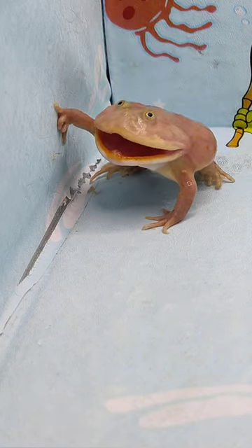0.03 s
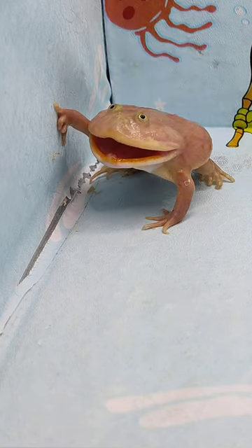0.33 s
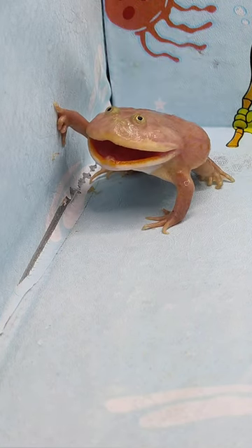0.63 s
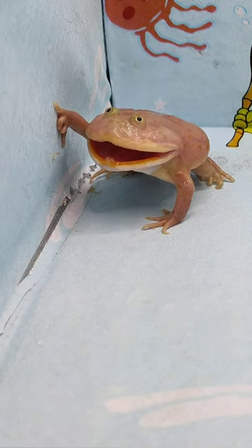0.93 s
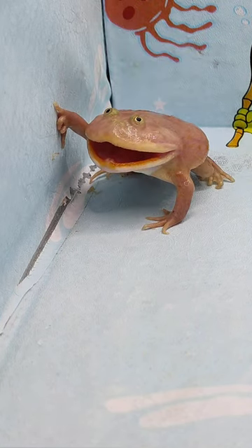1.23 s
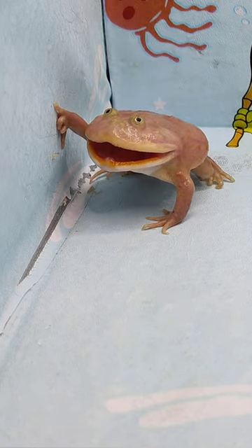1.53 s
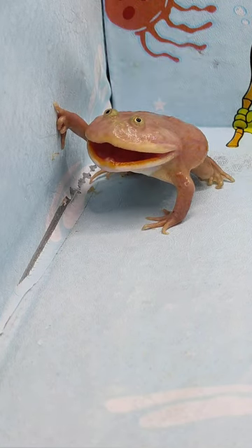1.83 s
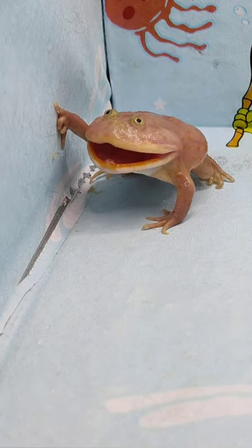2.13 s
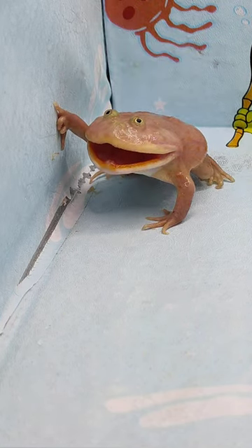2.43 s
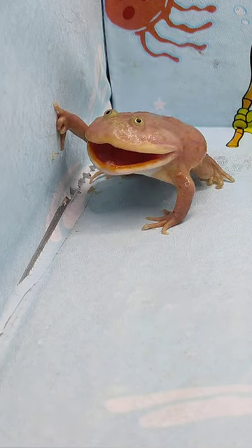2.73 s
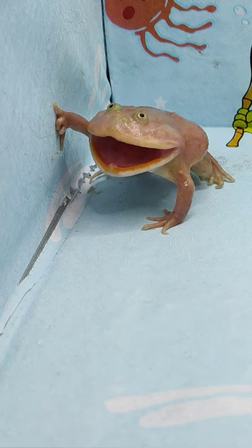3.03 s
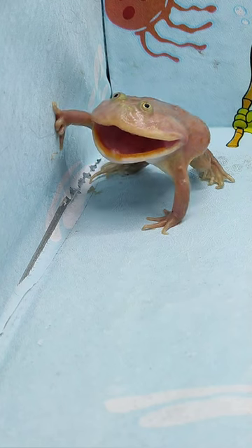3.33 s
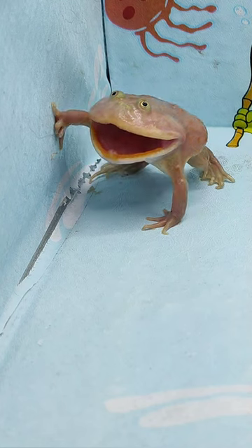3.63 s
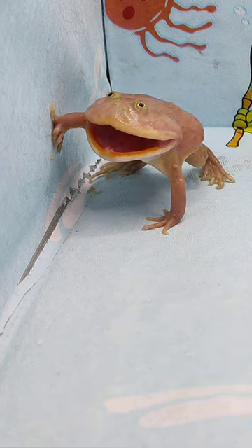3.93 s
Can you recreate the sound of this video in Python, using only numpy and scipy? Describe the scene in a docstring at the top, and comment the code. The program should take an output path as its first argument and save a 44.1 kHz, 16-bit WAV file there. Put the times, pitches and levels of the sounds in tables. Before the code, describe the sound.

A frog hisses continuously with a raspy, high squeal over soft low knocks.

```python
"""A frog gapes in a small plastic tub and a harsh, wet hiss sounds from start to end.
Tiny irregular spatters, bunched about a hundred times a second, reflect in the tub and excite narrow
resonances, one of them a squeal. Low buffets and dull knocks reach the microphone from the outset.
After three seconds the mouth opens wider: the hiss grows fuller, its bunches come quicker,
and a high resonance glides up and back down."""
import sys
import numpy as np
from scipy import signal
from scipy.fft import rfft, irfft, next_fast_len
from scipy.io import wavfile
from scipy.ndimage import uniform_filter1d

SR = 44100
rng = np.random.default_rng(int(sys.argv[2]) if len(sys.argv) > 2 else 0)


def digitize_waveform(pressure):
    """Quantize a signal to 16-bit integers and store it at the path in sys.argv[1].

    Rows of a 2-D input are taken as channels; values are limited to [-1, 1].
    """
    field = np.atleast_2d(pressure).T
    bounded = np.clip(field, -1, 1)
    quanta = np.round(bounded * 32767).astype(np.int16)
    wavfile.write(sys.argv[1], SR, quanta)


N = 176400
TIME = np.arange(N) / SR
FFT_SIZE = next_fast_len(N + SR // 2)
HZ = np.maximum(np.fft.rfftfreq(FFT_SIZE, 1 / SR), 1)


def from_db(db):
    """Decibels to amplitude ratio."""
    return 10 ** (np.asarray(db) / 20)


def unit_rms(x):
    """Normalisation: the mean of the channels gets rms 1."""
    return x / np.sqrt(np.mean(np.atleast_2d(x).mean(axis=0) ** 2) + 1e-20)


def over_time(rows):
    """Linear interpolation of a control curve at every sample."""
    return np.interp(TIME, *np.transpose(rows))


def over_hz(rows):
    """Interpolation of a table's columns along log frequency."""
    hz, *columns = np.transpose(rows)
    return np.array([np.interp(np.log(HZ), np.log(hz), column) for column in columns])


def bell(hz, width_hz):
    """Lorentzian power response of one resonance."""
    return 1 / (1 + (2 * (HZ - hz) / width_hz) ** 2)


def minimum_phase(db):
    """Causality: a response with this gain that rings only after it is excited."""
    cepstrum = irfft(np.log(from_db(db)), FFT_SIZE)
    return np.exp(rfft(cepstrum * (1 + np.sign(np.fft.fftfreq(FFT_SIZE)))))


def filtered(x, response):
    """Convolution, as a product of spectra."""
    return irfft(rfft(x, FFT_SIZE) * response, FFT_SIZE)[..., :N]


def noise(response):
    """Spectral shaping of white noise, at rms 1."""
    return unit_rms(filtered(rng.standard_normal((1, N)), response))


def sputter(wide):
    """Amplitude modulation bunches an uneven train of spatters and a little air noise."""
    spatters_per_s, spacing_spread, size_spread_db, air_db = 900, .38, 3, -9.5
    bunch_hz, wide_bunch_hz, bunch_width_hz, bunch_db = 113.6, 143, 31, 2
    spacing, size, polarity = rng.standard_normal((N // 20, 3)).T
    gaps = np.exp(spacing_spread * spacing)
    onsets = (np.cumsum(gaps / gaps.mean()) * SR / spatters_per_s).astype(int)
    heights = from_db(size_spread_db * np.minimum(size, 2)) * np.sign(polarity)
    spatters = np.zeros(N)
    spatters[onsets[onsets < N]] = heights[onsets < N]
    bunches = np.sqrt(1 - wide) * noise(bell(bunch_hz, bunch_width_hz))
    bunches += np.sqrt(wide) * noise(bell(wide_bunch_hz, bunch_width_hz))
    swell = from_db(bunch_db * np.minimum(bunches, 2))
    bunched = swell * (unit_rms(spatters) + from_db(air_db) * rng.standard_normal(N))
    return bunched / np.sqrt(uniform_filter1d(bunched ** 2, int(0.02 * SR)) + 1e-9)  # even over 20 ms


def tub(source):
    """Reverberation: direct sound, then exponentially decaying reflections, steady and scattered."""
    # reflections against the direct sound: frequency_hz, left_db, right_db
    reflection_levels = [(1360, -1, 0), (1860, -11.5, -13.5), (2420, 4, -5), (5330, 2.5, 0.5),
                         (9000, 7.5, 10), (13000, -24, 31)]
    # phase lag of the right channel behind the left: frequency_hz, lag_rad
    right_lag = [(600, 0.28), (1180, 1.77), (1400, 2.18), (2050, 3.37), (2300, 5.25), (2650, 2.4),
                 (2900, 6.54), (3500, 2.85), (4400, 6.3), (5250, 7.13), (5800, 7.4), (9000, 7.5),
                 (15500, 3.7)]
    t60_s, steady_share = 0.063, 0.51
    decay = from_db(-60 / (t60_s * SR)) ** 2  # power left after one sample
    reverberant_power = signal.lfilter([1 - decay], [1, -decay], source ** 2)
    scattered = rng.standard_normal((2, N)) * np.sqrt(reverberant_power)
    echoes = rfft(rng.standard_normal((2, SR // 4)) * np.sqrt(decay ** np.arange(SR // 4)), FFT_SIZE)
    echoes /= np.sqrt(uniform_filter1d(abs(echoes) ** 2, size=900, axis=1))
    reflected = from_db(over_hz(reflection_levels))
    lag = np.exp(1j * over_hz(right_lag) * [[0], [-1]])
    paths = (1 + reflected * np.sqrt(steady_share) * echoes) * lag
    scatter_gain = reflected * np.sqrt(1 - steady_share)
    total = np.sqrt(uniform_filter1d(abs(paths) ** 2, size=900, axis=1) + scatter_gain ** 2)
    return filtered(source, paths / total) + filtered(scattered, scatter_gain / total)


def mouth(source, wide, band):
    """Cavity resonance colours one band of the sputter; the peaks flatten as the mouth widens."""
    # broad spectral envelope: frequency_hz, left_db, right_db
    colour = [(360, -8.5, -12.0), (642, -12, -14), (910, -0.5, -5), (2685, -13.5, -7.5), (3435, 6, -3),
              (5200, -2.5, -1.5), (6360, -2, -3.5), (8000, -11, -10), (11340, -2.5, -10), (12750, 2.5, -11),
              (15500, 2, -5)]
    # resonances of mouth and tub: centre_hz, width_hz, left_db, right_db
    resonances = [(472, 137, 4, 9), (935, 46, 3, 11), (1085, 56, 2.5, 12), (1193, 94, 8.5, 5.5),
                  (1692, 284, 10, 10), (1927, 328, 11, 8), (2348, 270, 14, 2.5), (2840, 88, 10, 0),
                  (3503, 150, -5.5, 9), (3850, 360, 2, 6.5), (4090, 92, -8.5, 6), (4432, 128, 2, 15),
                  (4730, 110, 6.5, 0.5), (5023, 340, 12, 2), (5284, 264, 13, 16.5), (5960, 370, 5.5, 6),
                  (7440, 130, 8, 9.5), (9160, 550, 9, 9.5), (13110, 790, 11.5, 9), (14300, 540, 7.5, 8)]
    # change of colour with the mouth wide open: frequency_hz, gain_db
    wide_colour = [(1400, 0.5), (2700, 2), (3500, -1.5), (4200, 1), (5100, -2.5), (5550, 3.5), (11000, 4.5),
                   (13300, -1)]
    wide_ring_share = 0.81
    broad_db = over_hz(colour)
    ring_db = sum(bell(hz, width) * np.array([[left], [right]]) for hz, width, left, right in resonances)
    blurred_db = uniform_filter1d(ring_db, size=4000, axis=1)
    wide_ring_db = blurred_db + wide_ring_share * (ring_db - blurred_db)
    narrow = filtered(source, band * minimum_phase(broad_db + ring_db))
    opened = filtered(source, band * minimum_phase(broad_db + wide_ring_db + over_hz(wide_colour)))
    return (1 - wide) * unit_rms(narrow) + wide * unit_rms(opened)


def squeal(ringing):
    """Compression steadies the squealing band, which swells and fades apart from the rest."""
    # swell of the squeal, before the trim: time_s, level_db
    levels = [(.15, -33.5), (.3, -35.5), (.66, -39), (1.35, -36.5), (1.64, -38.5), (1.72, -40.5),
              (2.4, -42), (2.95, -40.5), (3.15, -39.5), (3.35, -36), (3.5, -41), (4, -43)]
    window_s, compression, trim_db = 0.0099, 0.29, 0.6
    power = uniform_filter1d(np.mean(ringing ** 2, axis=0), int(window_s * SR) + 1)
    steadied = unit_rms(ringing / (abs(power) + 1e-9) ** (compression / 2))
    return from_db(over_time(levels) + trim_db) * steadied


def glide(source):
    """A resonance with a moving centre, by heterodyning: shift down, low-pass, shift back up."""
    # path of the resonance, strong at the start and after three seconds: time_s, centre_hz, level_db
    path = [(.06, 5750, -42), (.3, 5950, -52), (2.98, 5400, -83), (3.07, 5570, -47), (3.21, 5860, -41),
            (3.3, 6340, -47), (3.47, 6140, -49), (3.56, 5500, -41), (3.66, 5060, -41), (3.83, 4600, -64)]
    width_hz = 1180
    time_s, centre_hz, level_db = np.transpose(path)
    carrier = np.exp(2j * np.pi * np.cumsum(np.interp(TIME, time_s, centre_hz)) / SR)
    lowpass = signal.butter(2, width_hz / 2, fs=SR, output="sos")
    ringing = signal.sosfilt(lowpass, source / carrier) * carrier
    return from_db(np.interp(TIME, time_s, level_db)) * unit_rms(ringing.real)


def hiss():
    """Source and filter: one sputter drives the broad hiss, the squeal and the gliding resonance."""
    # strength of the broad hiss, before the trim: time_s, level_db
    levels = [(0.03, -31.5), (0.14, -33.5), (1.12, -35), (1.29, -34), (2.38, -36.5), (3.01, -35),
              (3.15, -33), (3.73, -34.5)]
    widen_at_s, widen_takes_s, trim_db = 3.07, 0.029, 0.95
    squeal_hz, squeal_width_hz = 5330, 575
    wide = np.clip((TIME - widen_at_s) / widen_takes_s + .5, 0, 1)
    source = tub(sputter(wide))
    squeal_band = 1 / (1 + (2 * (HZ - squeal_hz) / squeal_width_hz) ** 4)
    broad = from_db(over_time(levels) + trim_db) * mouth(source, wide, 1 - squeal_band)
    return broad + squeal(mouth(source, wide, squeal_band)) + glide(source)


def rumble(top_hz):
    """Low-passed noise of rms 1, incoherent between the channels and stronger on the right."""
    white = from_db([[-6], [6]]) * rng.standard_normal((2, N))
    return unit_rms(signal.sosfilt(signal.butter(4, top_hz, fs=SR, output="sos"), white))


def buffets():
    """Pressure fluctuations at the microphone: bursts over a faint rumble, lumpy and booming."""
    # buffets, before lumps and boom: start_s, length_s, level_db, top_hz
    bursts = [(0.021, 0.15, -44, 161), (0.652, 0.78, -53, 124), (1.455, 0.4, -44, 217),
              (1.544, 0.18, -45.5, 234), (2.136, 0.029, -45, 183), (2.407, 0.18, -46, 176),
              (2.692, 0.035, -44.5, 190), (3.105, 0.106, -41.5, 182), (3.208, 0.92, -45, 157),
              (3.844, 0.069, -39, 201)]
    floor_db, edge_s, low_cut_hz = -57, 0.0067, 31
    lump_hz, lump_db, boom_hz, boom_db = 24, 3, 74.4, 4.5
    pressure = from_db(floor_db) * rumble(top_hz=142)
    for start_s, length_s, level_db, top_hz in bursts:
        inside_s = np.minimum(TIME - start_s, start_s + length_s - TIME)
        pressure += rumble(top_hz) * from_db(level_db) * np.clip(inside_s / edge_s + .5, 0, 1)
    pressure = signal.sosfilt(signal.butter(1, low_cut_hz, "high", fs=SR, output="sos"), pressure)
    lumps = from_db(lump_db * (np.minimum(noise(bell(lump_hz, lump_hz)), 2) - 1))
    return filtered(lumps * pressure, minimum_phase(boom_db * bell(boom_hz, boom_hz)))


def knocks():
    """Heavily damped oscillation: each knock swings for a cycle or two, mostly on the right."""
    # dull knocks on the microphone, before panning: start_s, level_db, pitch_hz
    impacts = [(.028, -31.5, 76), (1.273, -39.5, 78), (1.474, -35, 69), (1.584, -31.5, 128),
               (1.643, -31, 80), (1.673, -31.5, 247), (1.687, -32, 69), (1.804, -26, 185),
               (2.923, -32.5, 113), (3.124, -26.5, 124), (3.17, -31, 165), (3.534, -31, 86.5),
               (3.56, -32.5, 91), (3.79, -29, 110)]
    rise_cycles, left_db = 0.52, -27
    swings = np.zeros(N)
    for start_s, level_db, pitch_hz in impacts:
        cycles = np.maximum(TIME - start_s, 0) * pitch_hz
        age = cycles / rise_cycles
        sounding = (age > 0) & (age < 20)
        envelope = (age[sounding] * np.exp(1 - age[sounding])) ** 2
        swings[sounding] += from_db(level_db) * envelope * np.sin(2 * np.pi * cycles[sounding])
    pan = from_db([[left_db], [0]])
    return swings * pan / pan.mean()


def scene():
    """Superposition of the hiss, the buffets and the knocks."""
    return hiss() + buffets() + knocks()


def record(dry):
    """Band limiting: an elliptic low-pass cuts the top steeply."""
    cutoff_hz = 15450
    return signal.sosfilt(signal.ellip(12, .2, 80, cutoff_hz, fs=SR, output="sos"), dry)


dry = scene()
out = record(dry)
digitize_waveform(out)
```